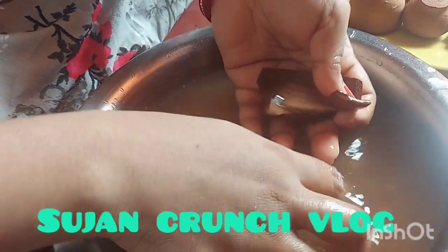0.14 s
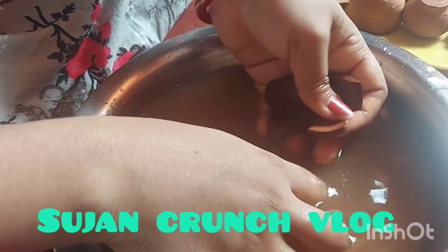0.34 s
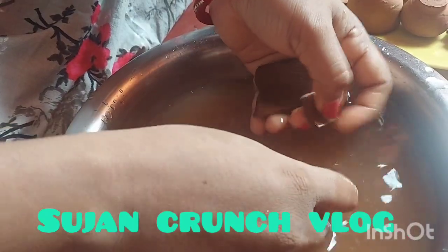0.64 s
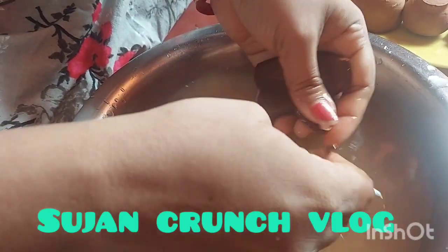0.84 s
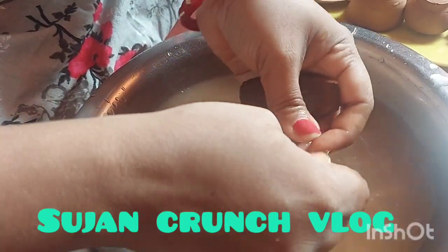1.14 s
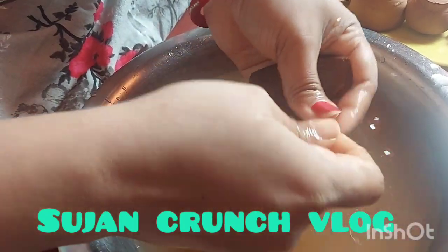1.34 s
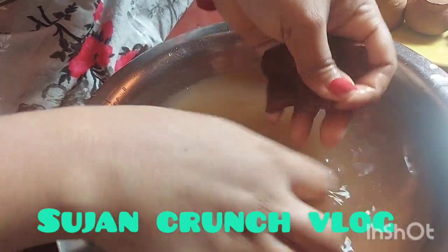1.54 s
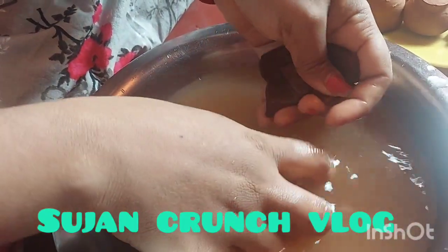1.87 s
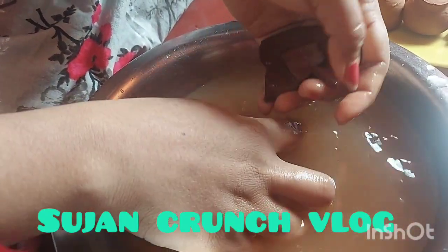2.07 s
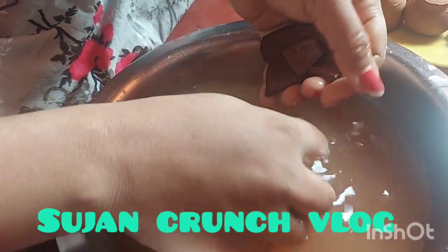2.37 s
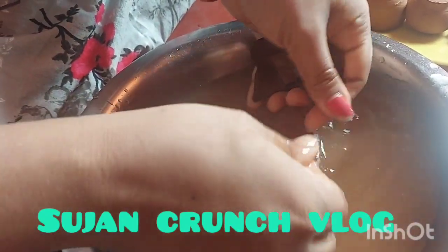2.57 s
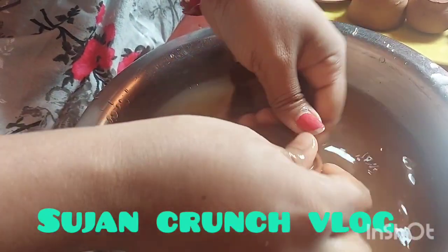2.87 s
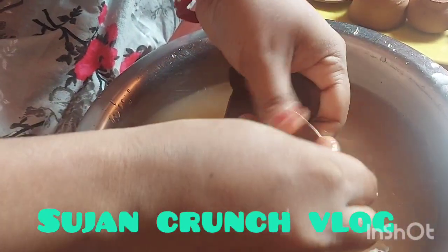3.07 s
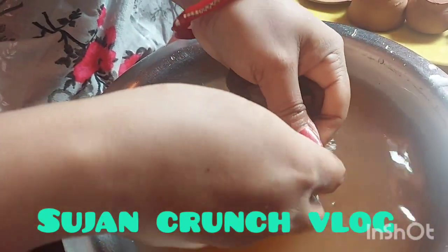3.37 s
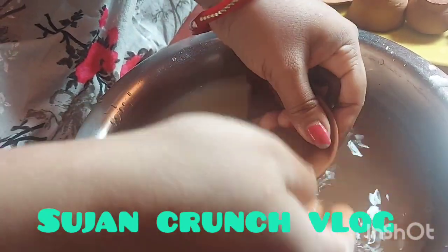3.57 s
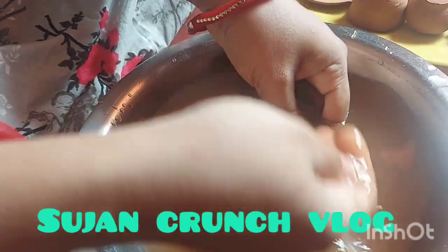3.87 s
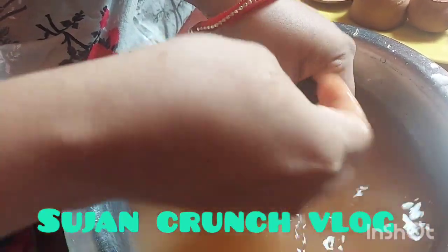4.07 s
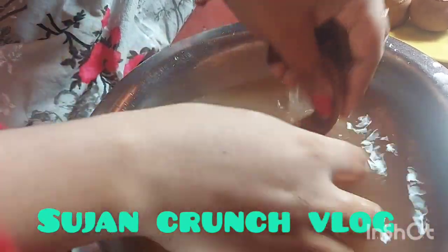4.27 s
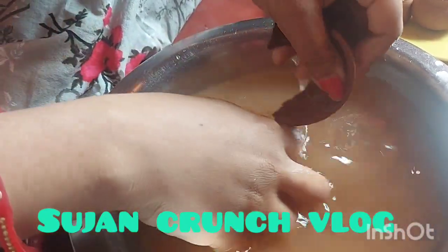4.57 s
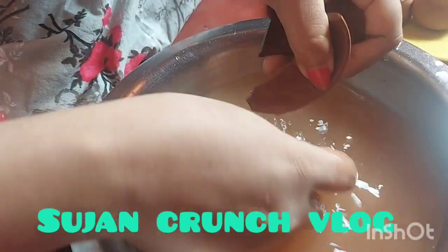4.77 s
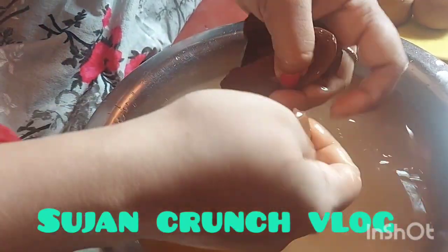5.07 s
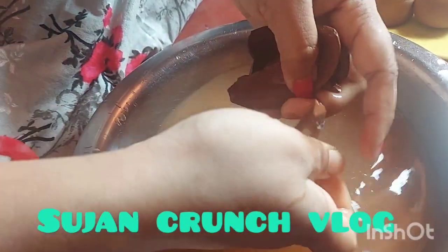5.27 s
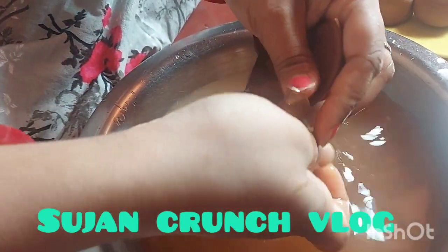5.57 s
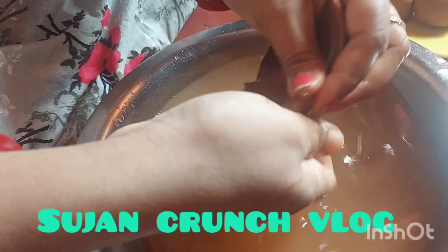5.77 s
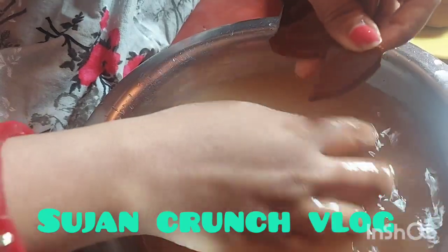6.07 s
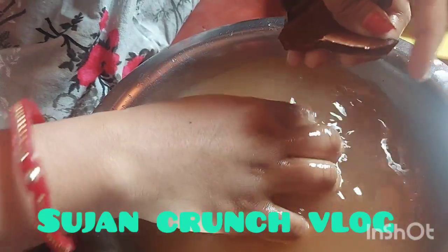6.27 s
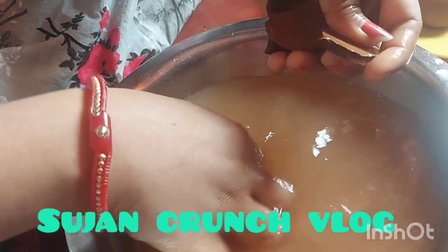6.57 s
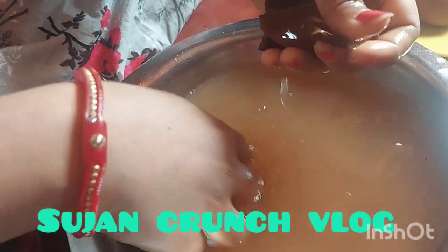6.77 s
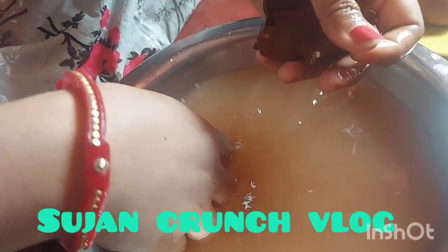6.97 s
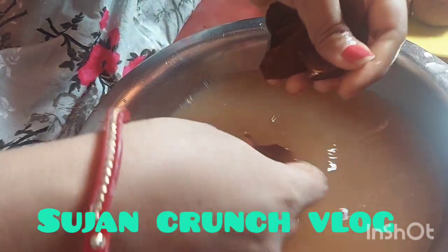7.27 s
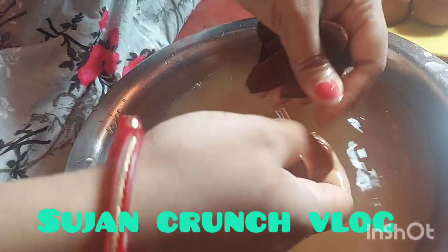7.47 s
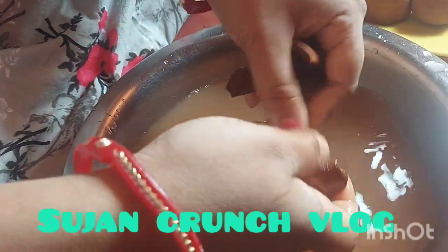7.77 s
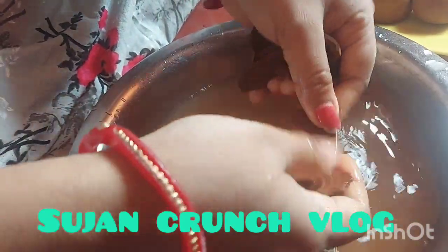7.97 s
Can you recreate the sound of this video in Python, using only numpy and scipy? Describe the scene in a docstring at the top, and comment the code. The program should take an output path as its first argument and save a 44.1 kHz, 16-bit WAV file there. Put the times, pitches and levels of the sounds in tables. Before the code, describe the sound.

Very close in a small hard room, clay shards are rinsed by hand in a steel basin of water. From 0.1 to 0.6 s a quick cluster of gritty clacks rattles and rings the metal, strongest near 0.35. A quiet gap follows, with faint rubbing and a drip. Around 1.6-2.5 s come scrapes, knocks and short rasps, then soft fizzing, gulps and tiny ticks from 3 to 3.8. Near 4.1-4.3 wet plops and clicks bunch together; scraping and knocks return at 4.6-4.9, with two faint falling chirps just before a bright shard clink at 5.1. After sparse ticks, a rim clank and tiny squeak sound at 6.2. Rubbing thickens from 6.5, peaking in loud clacks and ringing scrapes at 7.1-7.5, then fades to small drips and ticks. Distant dull thumps, about twice a second early on, and low hum sit behind.

```python
"""Rinsing clay shards in a steel basin

Pieces of a clay pot are fished out of water and rinsed by hand, close to a phone. Gritty shards drag over the
steel and knock on it: random clicks are coloured and the blows set fading tones of the basin ringing.
Shards clink on each other, fingers rub wet clay, drips plop as gliding tones and water fizzes and sloshes.
Further off, filtered noise makes thumps, often about twice a second, and the mains hum. Swept tones make two
faint falling chirps, then one short, almost steady squeak of a wet finger."""
import sys
import numpy as np
from scipy import signal
from scipy.fft import rfft, irfft, next_fast_len
from scipy.io import wavfile

SR = 44100
rng = np.random.default_rng(int(sys.argv[2]) if len(sys.argv) > 2 else 0)


def materialize(psi):
    """Save the field psi as 16-bit PCM at rate SR to the path in sys.argv[1].

    A 1-D psi becomes a single channel; in a 2-D psi each row is a channel.
    """
    bounded = np.clip(np.atleast_2d(psi).T, -1, 1)
    quanta = np.round(bounded * 32767).astype(np.int16)
    wavfile.write(sys.argv[1], SR, quanta)


N = 358708
T = np.arange(N) / SR  # time of each sample [s]
# phase offset [rad] of the two microphone ports, left and right
PORT_PHASE = np.array([[0], [1]])

# strokes of the fingers over wet clay:
# (peak time [s], swell [s], ebb [s], level [dB], top treble against that level [dB])
RUB_STROKES = [(.29, 0.11, 0.079, -45, 1.5), (.47, 0.057, 0.21, -54, -1), (.865, .04, 0.061, -57, 11),
               (1.56, 0.0069, 0.018, -63, 21.5), (1.79, 0.13, 0.041, -56.5, 10),
               (1.905, 0.038, 0.067, -44, -0.5), (2.02, 0.082, 0.22, -61, 7),
               (2.205, 0.046, 0.083, -45.5, -1), (3.28, 0.1, 0.045, -55, 3), (3.52, 0.17, 0.097, -57, -11),
               (4.12, 0.13, 0.23, -60, 8), (4.4, 0.015, 0.019, -53, -8), (4.49, 0.046, 0.079, -49.5, -2),
               (4.675, 0.077, 0.045, -42, -0.5), (4.76, .05, 0.094, -53.5, -4),
               (4.92, 0.2, 0.083, -47.5, 0), (5.035, 0.033, .025, -64, -9), (5.445, 0.022, 0.055, -54.5, 5),
               (5.519, 0.026, 0.021, -48, 5), (6.0, 0.028, 0.035, -53, 5.5), (6.3, 0.1, 0.1, -48, 0),
               (6.57, 0.2, 0.17, -45.5, -0.5), (6.69, 0.051, 0.12, -39, -1.5),
               (6.82, 0.093, 0.089, -44, -4), (6.99, 0.18, 0.11, -44, 2), (7.17, 0.082, 0.1, -41.5, -2),
               (7.27, .06, 0.17, -42, -5), (7.33, 0.04, 0.068, -41.5, 0), (7.47, 0.11, 0.1, -49, 1),
               (7.695, 0.032, 0.028, -52.5, 2), (7.81, 0.038, 0.1, -55, 3), (8.12, 0.013, .05, -60, -14)]
RUB_REST_DB = -66.5  # between strokes the fingers keep shifting


def undb(db):
    """Turn decibels into a gain: 20 dB is ten times the size."""
    return 10 ** (np.asarray(db) / 20)


def unit(x):
    """Scale a sound to an average (rms) size of 1."""
    return x / np.sqrt(np.mean(x ** 2))


def fade(t60, length):
    """Die away by 60 dB every t60 seconds; the curve is `length` seconds long."""
    return np.exp(-np.log(1000) * T[:int(length * SR)] / max(t60, 1 / SR))


def add(out, s, x):
    """Mix x into out from time s [s]."""
    i = max(int(s * SR), 0)
    out[..., i:i + x.shape[-1]] += x[..., :N - i]


def band(x, hz, width, order=2):
    """Keep only a band of pitches around hz."""
    low = np.hypot(hz, width / 2) - width / 2
    high = min(low + width, SR / 2 - 1000)
    return signal.sosfilt(signal.butter(order, [low, high], "band", fs=SR, output="sos"), x)


def colour(x, points):
    """Make pitches louder or softer along a curve of (pitch [Hz], level [dB]) points."""
    hz, db = np.transpose(points)
    size = next_fast_len(N + 4096)
    f = np.maximum(np.fft.rfftfreq(size, 1 / SR), 1)
    gain = undb(np.interp(np.log(f), np.log(hz), db))
    return irfft(rfft(x, size) * gain, size)[..., :N]


def noise(size, shared=0.25):
    """Left and right hiss; `shared` is the part of the power that both sides have in common."""
    shared = np.clip(shared, 0, 1)
    both = rng.standard_normal((3, size))
    return np.sqrt(shared) * both[0] + np.sqrt(1 - shared) * both[1:]


def walk(rate):
    """Wander at random around zero with an rms of 1, in straight lines between `rate` points a second."""
    return unit(np.interp(T * rate, np.arange(4096), rng.standard_normal(4096)))


def grit(rate, spread_db):
    """Sand grains catching: about `rate` random clicks a second, some much larger than the rest."""
    size = undb(spread_db * np.minimum(rng.exponential(size=N), 3))
    clicks = rng.random(N) < rate / SR
    return unit(clicks * size * np.sign(noise(N, shared=.6)))


def ring(modes, length):
    """Fading tones set going by a brief push; each reaches the two ports with its own phase."""
    t = T[:int(length * SR)]
    shape = (len(modes), 1, 1)
    phases = 2 * np.pi * rng.random(shape) + PORT_PHASE * rng.uniform(-1.5, 1, shape) * np.pi / 2
    onset = np.minimum(t / .0004, 1)
    tones = 0
    for (hz, db, t60), phase in zip(modes, phases):
        tones = tones + undb(db) * fade(t60, length) * np.sin(2 * np.pi * min(hz, SR / 2) * t + phase)
    return onset * tones


def burst(hz, width, t60, order=2, rise=0.0017):
    """A crumbly contact: a short fading rattle of noise in one band, peak near 1."""
    envelope = fade(t60, t60 + .02)
    envelope = envelope * (1 - np.exp(-T[:len(envelope)] / rise))
    x = band(noise(len(envelope), shared=0.098) * envelope, hz, width, order)
    return x * np.sqrt(np.sum(envelope ** 2) / np.sum(x ** 2))


def strokes(rows, attack_s, release_t60):
    """Gain of (start [s], length [s], level [dB]) gestures: swell, hold, die away; the strongest leads."""
    out = np.zeros(N)
    for s, length, db in rows:
        i = int(np.clip(s * SR, 0, N - 1))
        age = T[:min(N - i, int((length + release_t60) * SR))]
        release = np.exp(-np.log(1000) * np.maximum(age - length, 0) / release_t60)
        shape = np.minimum(age / attack_s, 1) * release
        out[i:i + len(age)] = np.maximum(out[i:i + len(age)], undb(db) * shape)
    return out


def swells(rows):
    """Gain of (peak time [s], swell [s], ebb [s], level [dB]): 10 dB down a swell before or an ebb after."""
    power = 0
    for s, swell, ebb, db in rows:
        away = np.maximum((s - T) / swell, (T - s) / ebb)
        power = power + undb(db - 10 * np.minimum(away * np.sqrt(away), 10)) ** 2
    return np.sqrt(power)


def background():
    """Coloured noise for room air, wavering tones for the mains hum, swept tones for chirps and a squeak."""
    # air: (pitch [Hz], level [dB])
    air_colour = [(18, -70), (30, -12), (90, 6), (161, -5.5), (204, -3), (415, -16.5), (1100, -23.5),
                  (1720, -18.5), (2830, -16), (4300, -9), (5450, -17), (14800, -30.5), (16000, -37)]
    # hum tones: (pitch [Hz], level [dB]) before the swelling below
    hum_tones = [(100, -67), (200, -69)]
    # the hum swells and fades: (time [s], level [dB])
    hum_swell = [(0, -2), (.3, 3.5), (1.2, 4.5), (3.6, 2), (4.6, -2.5), (5.3, -7.5), (5.65, -8.5),
                 (6.1, -2.5), (6.6, -2.5), (8.1, -8.5)]
    # two faint falling chirps, then one short, almost steady squeak of a wet finger:
    # (time [s], length [s], start pitch [Hz], end pitch [Hz], level [dB])
    high_notes = [(4.928, 0.059, 7360, 5300, -51), (4.993, 0.078, 6900, 5140, -52.5),
                  (6.197, 0.023, 8400, 8350, -43)]
    air_db = -62
    out = undb(air_db) * unit(colour(noise(N, shared=0.29), air_colour)) * undb(0.5 * walk(5.2))
    for hz, db in hum_tones:
        flutter = undb(3 * walk(14)) * np.sin(2 * np.pi * hz * T + .9 * walk(18))
        out += undb(db + np.interp(T, *np.transpose(hum_swell))) * unit(flutter)
    for s, length, start_hz, end_hz, db in high_notes:
        hz = np.linspace(start_hz, end_hz, int(length * SR))
        tone = np.sin(2 * np.pi * np.cumsum(hz) / SR)
        add(out, s, undb(db) * np.hanning(len(hz)) * tone)
    return out


def rubbing(rub):
    """Wet skin on fired clay: a fine rasp that catches and slides, its sheen changing with the strokes."""
    # the rasp: (pitch [Hz], level [dB])
    rasp_colour = [(500, -34), (1200, -17), (1900, -15.5), (2900, -8.5), (3600, -3.5), (4400, 3.5),
                   (4800, -4.5), (6500, -6), (8700, -13), (12000, -16), (14200, -15.5), (16000, -19)]
    # what part of the rasp is its top treble: (pitch [Hz], level [dB])
    top_colour = [(5500, -40), (8000, -5), (11000, -1)]
    catch = undb(2.4 * walk(90) + .7 * walk(30))
    rasp = unit(colour(grit(rate=1700, spread_db=1.5) * catch, rasp_colour))
    top = colour(rasp, top_colour)
    sheen_rows = [(s, swell, ebb, db + sheen_db) for s, swell, ebb, db, sheen_db in RUB_STROKES]
    sheen = np.hypot(swells(sheen_rows), undb(RUB_REST_DB))
    return rub * (rasp - top) + sheen * top


def knocks():
    """Shards knock under water: a noisy clack, a dull body and brief tones; also the push on the steel."""
    # (time [s], level before trims [dB], clack pitch [Hz], body against clack before trims [dB],
    #  basin ring before trims [dB])
    knock_rows = [(.049, -45.5, 4200, 1, -12), (.127, -38, 4060, -17, -13), (.237, -28.5, 3500, 7.5, -5),
                  (0.247, -23.5, 3500, -21, 3), (0.29, -25, 4380, -3, -5), (.315, -21.5, 4650, -7.5, -6),
                  (.339, -14, 3820, -7, -19), (.415, -25, 4110, -16, -7), (0.148, -49.5, 3800, 7, -5),
                  (.552, -29.5, 3870, 1.5, -7), (.566, -34.5, 3910, 4, -10), (1.669, -29.5, 4000, -19, -14),
                  (1.736, -40, 4300, 12, -22), (1.811, -20.5, 3500, -1.5, -13.5),
                  (1.99, -35.5, 3870, 6, 0.5), (2.114, -21.5, 3670, -3.5, -8.5),
                  (2.343, -40, 3530, 7.5, -14), (2.431, -37, 4100, 0, -6), (4.682, -26, 4740, -25, -10),
                  (4.832, -23, 3670, -13.5, -9), (4.853, -28, 3580, -9, -22), (6.539, -38, 4360, -9, 5),
                  (6.655, -20, 4000, -19, -3), (6.744, -21.5, 3880, -20, -6.5),
                  (6.928, -24.5, 4000, -20, -16), (6.981, -25.5, 4070, -27, -15),
                  (6.997, -19.5, 4080, -9.5, -7), (7.117, -7.5, 4090, -37, -15),
                  (7.133, -12, 4570, -19.5, -10), (7.152, -23.5, 4370, 0.5, -5.5),
                  (7.165, -33, 4270, 3, -1), (7.177, -15.5, 4580, -16, -3.5), (7.209, -26, 3660, -20, 5),
                  (7.409, -10.5, 4480, -31, -1.5), (7.456, -25.5, 4300, -6.5, 3),
                  (7.509, -19.5, 3520, -11.5, -2), (7.522, -17.5, 4300, -20, -14)]
    # a wet shard rings briefly: (ratio to the clack pitch, level [dB], 60 dB fade [s])
    wet_modes = [(.6, -21, 0.021), (0.881, -9, 0.033), (1, -7.5, 0.03), (1.09, -12.5, 0.019)]
    clack_t60_s, body_t60_s = .046, .057
    out, push = np.zeros((2, N)), np.zeros(N)
    for s, db, hz, body_db, ring_db in knock_rows:
        clack = undb(-2.0) * burst(hz, 0.27 * hz, clack_t60_s, rise=0.00046)
        clack = clack + undb(-8.0) * burst(4300, 2350, clack_t60_s)
        tones = [(ratio * hz, mode_db, t60) for ratio, mode_db, t60 in wet_modes]
        clack = clack + ring(tones, clack_t60_s + .02)
        body = burst(1254, 1250, body_t60_s, rise=0.0021)
        add(out, s, undb(db - 4.5) * clack)
        add(out, s, undb(db + body_db - 1.0) * body)
        add(push, s, undb([db + body_db / 2 + ring_db]))  # a push of one sample
    return out, push


def bend(x, shift):
    """Bend the pitch by reading the sound a little early or late; shift is in seconds."""
    return np.array([np.interp(T + shift, T, side) for side in x])


def basin(blows, friction):
    """Knocks and scraping ring wall and bottom; a hand mutes the bottom, moving water bends the wall most."""
    # the wall, loaded with water: (pitch [Hz], level [dB], 60 dB fade [s])
    wall_modes = [(408, -19, 0.35), (907, -4.5, 0.066), (1456, -15, 0.16), (1620, -10, 0.23),
                  (1862, -2.5, 0.21), (1900, -4, 0.24), (2240, 0, 0.087), (2320, -4, 0.11),
                  (2330, 2, 0.077), (2527, 0, 0.097), (2860, -11, .1), (3490, 5, 0.039), (3720, -7, 0.079),
                  (4240, -5, 0.12), (4320, -3, 0.11), (4360, -1, .14), (4370, -2.5, 0.14),
                  (5010, -17, 0.14), (5720, -11.5, 0.3)]
    # the bottom: (pitch [Hz], level [dB], 60 dB fade [s])
    bottom_modes = [(1135, 0.5, 0.46), (1060, -21, .12), (1258, -2.5, 0.075)]
    # a hand presses on the bottom: (start [s], length [s])
    press_rows = [(0.174, 0.32), (2.31, 2.1), (5.002, 1.9), (7.337, 0.2), (7.547, .55)]
    bottom_db, press_db, press_attack_s, press_release_t60_s = 2.5, -18.5, 0.038, 1
    wall = 0
    for mode in wall_modes:
        # each mode answers more or less as the place of contact moves
        push = (blows + friction) * undb(2.5 * walk(5))
        wall = wall + signal.oaconvolve(push[None], ring([mode], .5), axes=1)[:, :N]
    bottom_push = blows + undb(-18.0) * friction
    bottom = signal.fftconvolve(bottom_push[None], ring(bottom_modes, 1), axes=1)[:, :N]
    pressed = strokes([(s, length, 0) for s, length in press_rows], press_attack_s, press_release_t60_s)
    bottom *= undb(bottom_db + press_db * pressed)
    sway_s = .0003 * walk(13)
    return bend(wall, sway_s) + bend(bottom, sway_s * 0.66) + bowing()


def dragging(rub):
    """Shards stick and slip over the bottom while clay crumbs clatter; also their push on the steel."""
    # (start [s], length [s], level before trim [dB], swell [s])
    drag_rows = [(0.155, 0.2, -45.5, 0.051), (0.371, 0.15, -54, .02), (0.532, 0.027, -45, 0.028),
                 (1.645, 0.15, -51, 0.01), (1.765, 0.12, -48, 0.02), (1.934, 0.14, -52, 0.026),
                 (2.135, 0.14, -47.5, 0.045), (2.31, 0.23, -56, .02), (3.192, 0.1, -60, 0.054),
                 (3.955, 0.085, -56, 0.033), (4.312, .3, -60, 0.037), (4.607, 0.28, -50.5, .07),
                 (4.803, 0.12, -46, 0.04), (5.976, 0.017, -62, .02), (6.221, 0.032, -41.5, 0.015),
                 (6.29, 0.048, -60, .02), (6.461, 0.058, -45.5, 0.042), (6.554, 0.057, -53, .02),
                 (6.763, 0.34, -49, 0.067), (7.126, 0.17, -43.5, 0.016), (7.274, 0.093, -49.5, 0.016),
                 (7.412, .035, -45.5, 0.012), (7.507, 0.044, -55.5, .02), (7.76, .42, -66.5, 0.028)]
    # the scrape: (pitch [Hz], level [dB])
    scrape_colour = [(150, -9), (400, -3), (600, -5), (900, -8), (1500, 1), (1900, -4), (2400, -35),
                     (2900, -6), (3600, 6), (4400, -8.5), (5000, -1), (8000, -12), (14000, -42)]
    release_t60_s = 0.28
    slips = grit(rate=1400, spread_db=4.5) * undb(3.8 * walk(90))
    gains = [strokes([(s, length, db)], swell, release_t60_s) for s, length, db, swell in drag_rows]
    force = np.max(gains, axis=0)
    out = undb(-1.5) * force * unit(colour(slips, scrape_colour))
    stir = force + rub
    for when, pitch, size in rng.random((320, 3)):
        i, hz = int(when * N), 1900 * 3.1 ** pitch
        crumb_db = 15 * size ** 2 - 5
        add(out, i / SR, stir[i] * undb(crumb_db) * burst(hz, 0.25 * hz, 0.012, rise=0.0001))
    return out, undb(-41.5) * force * slips[0]


def thumps():
    """Far blows, nearly all echo: bands of noise where the slap comes first and the lows build up late."""
    # (time [s], level [dB], weight of the slap [dB])
    thump_rows = [(0.198, -42.5, -2.5), (0.724, -44, -0.5), (1.24, -43, -3.5), (1.769, -40.5, -2),
                  (2.274, -40.5, -1), (2.842, -45, -1), (3.934, -58, -0.5), (4.328, -55, -2),
                  (5.725, -49, 2), (6.293, -44, 3), (6.837, -43, 2.5), (7.778, -53, 3)]
    # how a thump arrives: (pitch [Hz], width [Hz], level [dB], build-up [s], 60 dB fade [s])
    band_rows = [(129, 77, -9, 0.021, 1), (218.2, 55.6, -4.5, 0.017, 0.97), (384, 258, -4.5, 0.016, 0.66),
                 (820, 213, -2, 0.018, 0.43), (1670, 1620, 2.5, 0.011, 0.48),
                 (2880, 2080, 4.5, 0.0094, 0.39), (3350, 930, 6.5, 0.0018, 0.072),
                 (5240, 8000, -15, 0.024, 1), (8650, 420, -16.5, 0.0034, 0.43)]
    slap_hz = 700  # bands above this belong to the slap
    out, t = np.zeros((2, N)), T[:SR]
    for hz, width, band_db, build, t60 in band_rows:
        envelope = np.zeros(N)
        for s, db, slap_db in thump_rows:
            gain = undb(db + band_db + slap_db * (hz > slap_hz))
            add(envelope, s, gain * (1 - np.exp(-t / build)) * fade(t60, 1))
        shared = 1 / (1 + (hz / 400) ** 2)  # low sounds are more alike on both sides
        out += envelope * unit(band(noise(N, shared=shared), hz, width))
    return out


def ticks(rub):
    """Shards shift in the hand: short noisy clacks with a trace of pitch; faint ones follow the rubbing."""
    # (time [s], level before trims [dB], pitch [Hz])
    tick_rows = [(0.3666, -23, 3520), (1.555, -28.5, 5930), (2.06, -23, 3550), (2.504, -30, 3700),
                 (2.547, -32.5, 2940), (3.0863, -37, 2800), (3.147, -34.5, 3350), (3.469, -37.5, 3570),
                 (3.112, -40, 3700), (3.208, -42, 4100), (3.345, -43.5, 2520), (3.635, -42, 3730),
                 (3.6758, -32, 3800), (3.709, -41, 3540), (3.745, -46, 3170), (3.8415, -39.5, 3220),
                 (4.0595, -28, 3160), (4.1114, -33, 2180), (4.132, -29, 3380), (4.1474, -30, 4930),
                 (4.156, -23, 2470), (4.181, -20.5, 3800), (4.195, -27.5, 4300), (4.213, -32, 5000),
                 (4.2174, -27, 3500), (4.25, -28, 7870), (4.256, -22.5, 3560), (5.2714, -23.5, 3570),
                 (5.463, -32, 3580), (5.469, -27.5, 3060), (5.662, -45, 3700), (5.99, -36, 4040),
                 (5.894, -37, 4100), (6.077, -44, 4230), (6.3909, -34, 4300), (6.435, -34, 4480),
                 (6.469, -31, 4200), (6.488, -37, 4270), (6.498, -40, 4240), (6.6026, -29.5, 4070),
                 (6.674, -27, 4260), (6.686, -31, 4300), (6.705, -36, 4200), (6.7854, -33, 4140),
                 (6.8404, -24.5, 3000), (6.954, -36, 4630), (7.339, -34, 3780), (2.077, -32, 3000),
                 (7.626, -45, 3300), (8.074, -47, 3730), (8.11, -41.5, 4100)]
    clack_t60_s, clack_db, tone_t60_s, tone_db = .018, -1.5, 0.013, -4.5
    chatter_per_s, chatter_db, chatter_hz = 15, 9, 4300  # top level against the rubbing, middle pitch
    out = np.zeros((2, N))
    for s, db, hz in tick_rows:
        clack = burst(hz, 0.48 * hz, clack_t60_s, rise=0.00018)
        clack = clack + undb(-12.5) * burst(2060, 3900, clack_t60_s, order=1)
        add(out, s, undb(db + clack_db) * clack)
        add(out, s + .001, ring([(hz, db + tone_db, tone_t60_s)], .03))
    for when, pitch, size in rng.random((int(chatter_per_s * N / SR), 3)):
        i, hz = int(when * N), chatter_hz * 2 ** (.6 * (pitch - .5))
        clack = burst(hz, 0.29 * hz, clack_t60_s, rise=0.00016)
        add(out, i / SR, rub[i] * undb(chatter_db) * size * clack)
    return out


def swishing():
    """Water squeezed between fingers fizzes in small cavities; the body of water sloshes unevenly below."""
    # squeezes: (peak time [s], swell [s], ebb [s], level [dB])
    squeeze_rows = [(3.22, 0.016, 0.091, -51), (3.285, 0.047, 0.054, -59), (3.5, 0.12, 0.07, -67),
                    (3.715, .02, 0.036, -54), (4.22, 0.053, .035, -53), (4.41, .03, 0.036, -62),
                    (7.69, .02, 0.027, -54.5)]
    # the cavities: (pitch [Hz], width [Hz], level [dB])
    cavities = [(1690, 280, -5.5), (2520, 170, -1), (3230, 390, 1.5), (4100, 620, 1.5)]
    # sloshes: (peak time [s], swell [s], ebb [s], level [dB])
    slosh_rows = [(.42, 0.023, 0.03, -51.5), (1.13, 0.073, .08, -70), (2.68, 0.094, .06, -69),
                  (3.1, 0.064, 0.06, -62.5), (3.27, 0.1, 0.049, -56.5), (3.5, 0.087, 0.1, -66),
                  (4.17, 0.059, 0.037, -62), (4.98, .05, .04, -68), (5.17, 0.056, 0.048, -72),
                  (7.3, 0.11, .06, -58)]
    fizz = grit(rate=900, spread_db=3.0)
    spray = unit(sum(undb(db) * unit(band(fizz, hz, width)) for hz, width, db in cavities))
    lapping = undb(3 * walk(22))
    slosh = unit(band(noise(N, shared=0.82), hz=160, width=137) * lapping)
    return swells(squeeze_rows) * spray + swells(slosh_rows) * slosh


def bowing():
    """A dragged shard catches in step with one tone of the steel and makes it sing, wavering and gliding."""
    # (start [s], length [s], level before wavering [dB], pitch [Hz], glide [Hz per s])
    bow_rows = [(.553, 0.047, -50.5, 1138, 0), (.565, .025, -48, 1830, 0), (1.72, 0.033, -58, 1134, 6),
                (1.991, .02, -42, 1120, 0), (1.992, .01, -50, 1827, 0), (2.12, 0.058, -45, 1133, -30),
                (4.64, 0.084, -60, 1138, -2), (4.795, 0.013, -46.5, 1138, 0),
                (4.845, 0.076, -47.5, 1147, 200), (6.295, 0.028, -44, 1142, 2),
                (6.76, 0.051, -55.5, 1138, 8), (6.845, 0.01, -41, 1133, -100), (6.985, 0.017, -47, 1150, 2),
                (7.135, 0.062, -44, 2255, 300), (7.182, 0.041, -37, 1149, -130),
                (7.195, 0.062, -41, 1890, 250), (7.265, 0.057, -48, 1134, 4),
                (7.27, 0.033, -43.5, 1935, -100), (7.412, 0.032, -41.5, 2214, 2),
                (7.435, 0.075, -48, 1158, -5), (7.51, 0.035, -58, 410, 2)]
    attack_s, release_t60_s = 0.0085, 0.24
    out = np.zeros((2, N))
    # a complex number holds loudness and phase together
    waver = undb(1.5 * walk(25)) * np.exp(1j * (.5 * walk(18) + PORT_PHASE))
    for s, length, db, hz, glide in bow_rows:
        t = T[:int((length + release_t60_s) * SR)]
        level = strokes([(0, length, db)], attack_s, release_t60_s)[:len(t)]
        tone = np.exp(2j * np.pi * (hz + glide * t / 2) * t)
        waver_now = waver.take(int(s * SR) + np.arange(len(t)), axis=1, mode="clip")
        add(out, s, level * np.imag(tone * waver_now))
    return out


def bubble(hz, t60, rise):
    """A ringing air pocket: a fading tone whose pitch glides by `rise` octaves over t60 seconds."""
    envelope = fade(t60, t60)
    age = np.linspace(0, 1, len(envelope))
    phase = 2 * np.pi * np.cumsum(hz * 2 ** (rise * age)) / SR
    return envelope * (1 - np.exp(-age / 0.044)) * np.sin(phase + PORT_PHASE)


def water(stir):
    """Drips and gulps ring as bubbles, fingers stir up tiny ones, and a low heave of noise joins each gulp."""
    # drips that trap a bubble:
    # (time [s], level before trim [dB], pitch [Hz], 60 dB fade [s], rise [octaves per fade])
    drip_rows = [(.896, -42, 2490, 0.025, -0), (2.671, -47.5, 1790, 0.022, -0.13),
                 (4.049, -40.5, 1910, 0.027, 0.4), (3.088, -53.5, 1830, 0.052, 0.15),
                 (3.088, -47, 2810, .02, 0.2), (3.149, -53, 1830, 0.015, -0),
                 (3.678, -46.5, 2560, 0.015, 0), (4.061, -34.5, 2860, 0.012, 0.1),
                 (4.061, -36, 3650, 0.0086, 0), (4.097, -22.5, 3560, 0.017, 1),
                 (4.133, -35.5, 1720, 0.017, -0.36), (4.157, -29.5, 2275, 0.027, 0.32),
                 (4.183, -30.5, 1380, 0.022, -0.05), (4.231, -36, 2980, .035, 0.26),
                 (4.256, -27, 1410, 0.018, -0), (4.261, -31, 3320, 0.016, 0.1),
                 (5.276, -33.5, 4220, 0.022, 0.23), (5.8945, -29, 4290, 0.017, -0.04),
                 (5.9055, -41.5, 3280, 0.02, -0.05), (5.905, -59, 4430, 0.051, 0.1),
                 (6.058, -47, 5150, .015, -0.1), (7.553, -41, 2650, .03, -0.3),
                 (7.926, -39.5, 2030, 0.035, -0.5)]
    # air pockets gulp under the palm:
    # (time [s], level before trims [dB], pitch [Hz], 60 dB fade [s], rise [octaves per fade])
    gulp_rows = [(2.243, -47.5, 1060, 0.147, -1.4), (2.298, -53, 430, 0.057, .38),
                 (3.07, -54, 180, 0.054, 0.41), (3.226, -52.5, 500, 0.024, 0.23),
                 (3.278, -48, 248, 0.084, 0.047), (3.441, -51.5, 209.6, 0.31, 0.19),
                 (3.502, -54, 297, 0.01, 0.25), (3.247, -60, 640, 0.027, .3), (3.305, -55, 570, .03, 0.43),
                 (4.12, -54, 183, 0.072, .2), (4.339, -45, 207, 0.09, 0.48), (5.125, -54, 218, 0.027, 0.31),
                 (5.525, -53.5, 403, 0.015, 0.66), (5.602, -63, 180, 0.021, .2)]
    heave_db, heave_hold_s, heave_attack_s, heave_t60_s = -5.5, 0.016, 0.011, 0.37
    out = np.zeros((2, N))
    for s, db, hz, t60, rise in list(drip_rows) + list(gulp_rows):
        add(out, s, undb(db + 6.5) * bubble(hz, t60, rise))
    for when, pitch, size in rng.random((200, 3)):
        i = int(when * N)
        tiny = bubble(1700 * 3 ** pitch, .016, .25)
        add(out, i / SR, stir[i] * undb(1 + 10 * size ** 2) * tiny)
    heave_rows = [(s, heave_hold_s, db + heave_db) for s, db, *_ in gulp_rows]
    heave = strokes(heave_rows, heave_attack_s, heave_t60_s)
    return out + heave * unit(band(noise(N, shared=1.0), hz=164.0, width=113))


def strike(modes, crack_db, crack_t60):
    """A hard blow: a broad crack of noise and the tones that it sets ringing."""
    tone = ring(modes, .3)
    tone = tone / np.sqrt(np.mean(tone[:, :200] ** 2)) / 2  # level set by the first 200 samples
    add(tone, 0, undb(crack_db) * burst(6100, 5200, crack_t60, order=1, rise=0.00092))
    return tone


def clinks():
    """Hard blows ring shard on shard, with crushed grit as noise, and the steel rim."""
    # a shard grazes another, lands and rebounds:
    # (time [s], level before trims [dB], fade factor, crack [dB], brightness [dB per octave])
    clink_rows = [(5.1032, -18.5, 1.1, -2, -11.5), (5.1102, -8, 1.14, 0, 6.5), (5.1152, -16, 0.56, -15, 1)]
    # a shard in the air: (pitch [Hz], level before brightness [dB], 60 dB fade before its factor [s])
    shard_modes = [(2000, -14.5, 0.0084), (2490, -6.5, 0.023), (2600, -7.5, 0.015), (3270, -5, 0.013),
                   (3500, -6, 0.014), (4490, -1, 0.03), (4490, -3, 0.056), (5100, -9.5, 0.017),
                   (6200, -10, 0.016), (6740, -8, 0.016), (7600, -6, .009), (7940, -2.5, 0.015),
                   (8850, -13, 0.011), (12100, -22, 0.006), (13500, -15, .006), (13600, -10, 0.0055),
                   (14400, -14, .005)]
    # something hard clanks on the rim as the hand goes under:
    # (time [s], level before trim [dB], crack [dB])
    clank_rows = [(6.221, -19.5, -1)]
    # the steel rim: (pitch [Hz], level [dB], 60 dB fade [s])
    rim_modes = [(424, -10, 0.11), (767, -15.5, 0.46), (1815, -6.5, 0.52), (2390, -12.5, 0.23),
                 (3250, 3, .12), (3910, 7.5, 0.2), (4040, -6, .09), (4250, 0, 0.13), (4550, 3, 0.19),
                 (5620, 1, 0.13), (5720, -12, .14), (6000, -2, 0.11), (6910, 3, 0.093), (7620, -10, 0.082),
                 (8300, -3, 0.1), (9500, -11, 0.16), (10900, -10, 0.12)]
    crumble_db, crumble_hz, crumble_t60_s = -18.5, 3000, 0.092  # grit crushed between two shards
    out = np.zeros((2, N))
    lowest_hz = shard_modes[0][0]
    for s, db, damping, crack_db, tilt_db in clink_rows:
        modes = [(hz, mode_db + tilt_db * np.log2(hz / lowest_hz), t60 * damping)
                 for hz, mode_db, t60 in shard_modes]
        add(out, s, undb(db - 6.0) * strike(modes, crack_db, crack_t60=0.0037))
        add(out, s, undb(db + crumble_db) * burst(crumble_hz, 5800, crumble_t60_s, rise=0.0056))
    for s, db, crack_db in clank_rows:
        add(out, s, undb(db - 2.5) * strike(rim_modes, crack_db, crack_t60=0.041))
    return out


def cupped(x):
    """Echoes between the moving hands and the steel: short changing delays make resonances that shift."""
    out = x
    for lag_s, echo in (.0011, .42), (.0034, -.45):
        late = T - lag_s * (1 + .09 * walk(12))
        echoed = np.array([np.interp(late, T, side) for side in out])
        out = (out + echo * echoed) / np.hypot(1, echo)
    return out


def room(x, near_db, near_t60, far_db, far_t60):
    """Fading noise gives quick reflections inside the basin, then the tail of a small hard room."""
    dull_hz = 8100  # reflections lose the treble above this
    response = 0
    for db, t60 in (near_db, near_t60), (far_db, far_t60):
        tail = noise(SR, shared=0) * fade(t60, 1) * (1 - np.exp(-T[:SR] / (0.017 * t60)))
        response = response + undb(db) * unit(tail) / np.sqrt(SR)
    response = signal.sosfilt(signal.butter(1, min(dull_hz, SR / 3), fs=SR, output="sos"), response)
    return x + signal.fftconvolve(x, response, axes=1)[:, :N]


def scene():
    """Everything in the basin sounds into the room; the two microphone ports colour it differently."""
    # the two ports: (pitch [Hz], left minus right [dB])
    port_gaps = [(60, -8.5), (130, -1.5), (500, 0), (1900, 1), (2600, -3.5), (3700, -12), (4500, -11.5),
                 (5400, -4.5), (7000, -9), (8200, -5), (10000, -0.5), (13500, 8)]
    rub = np.hypot(swells([row[:4] for row in RUB_STROKES]), undb(RUB_REST_DB))
    clacks, blows = knocks()
    scrape, friction = dragging(rub)
    close = clacks + cupped(scrape + rubbing(rub))
    close = close + basin(undb(-12.0) * blows, friction)
    close = close + ticks(rub) + swishing() + water(rub) + clinks()
    near = room(close, near_db=-9.0, near_t60=0.099, far_db=-9.5, far_t60=0.35)
    left, right = near + thumps() + background()
    # the sum of both port gains, as powers, stays the same at each point
    left_colour = [(hz, gap - 10 * np.log10((1 + undb(gap) ** 2) / 2)) for hz, gap in port_gaps]
    right_colour = [(hz, db - gap) for (hz, db), (_, gap) in zip(left_colour, port_gaps)]
    return np.array([colour(left, left_colour), colour(right, right_colour)])


def record(dry):
    """The phone cuts the top: a steep filter removes what lies above 16 kHz."""
    return signal.sosfilt(signal.ellip(10, .2, 70, 16000, fs=SR, output="sos"), dry)


dry = scene()
out = record(dry)
materialize(out)
```